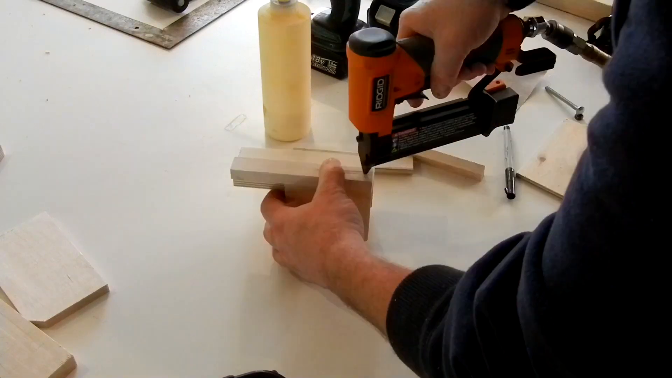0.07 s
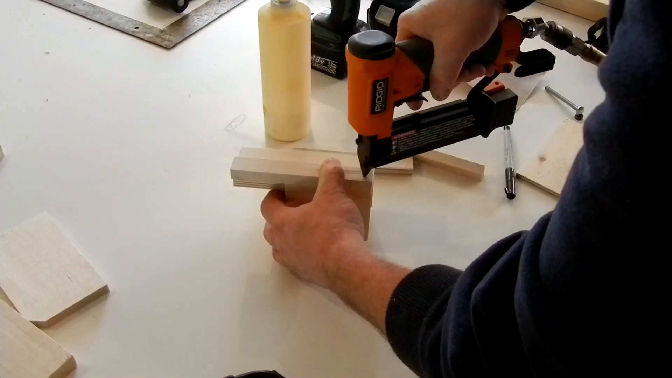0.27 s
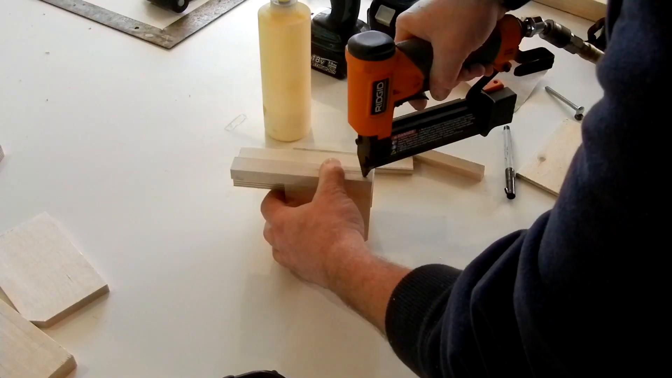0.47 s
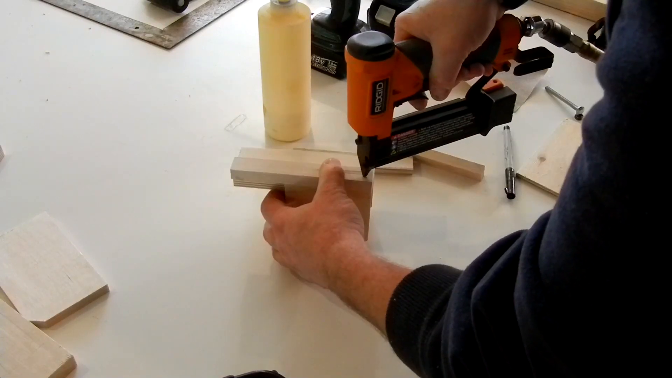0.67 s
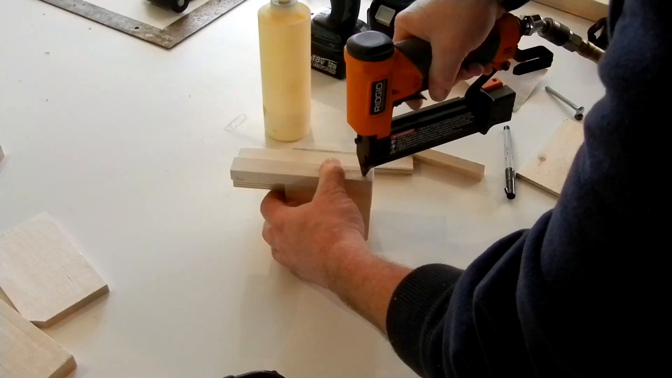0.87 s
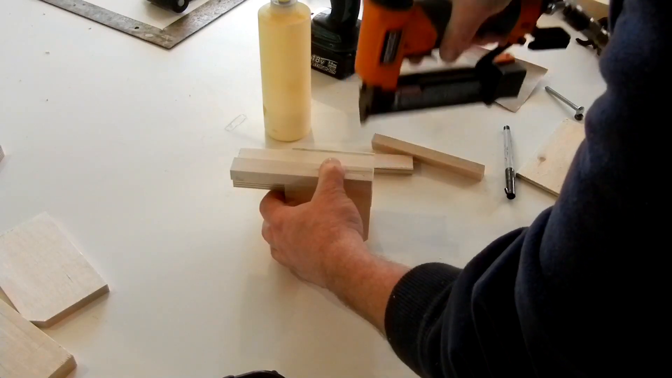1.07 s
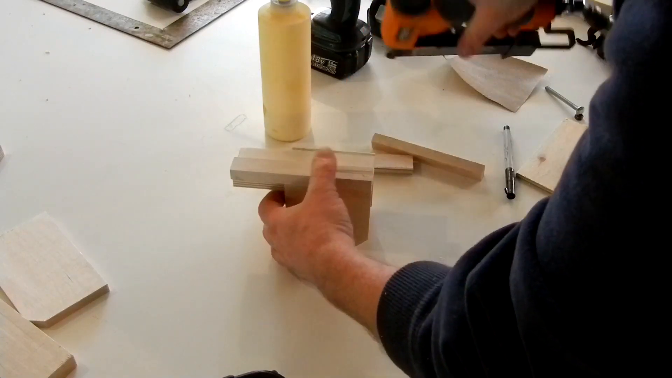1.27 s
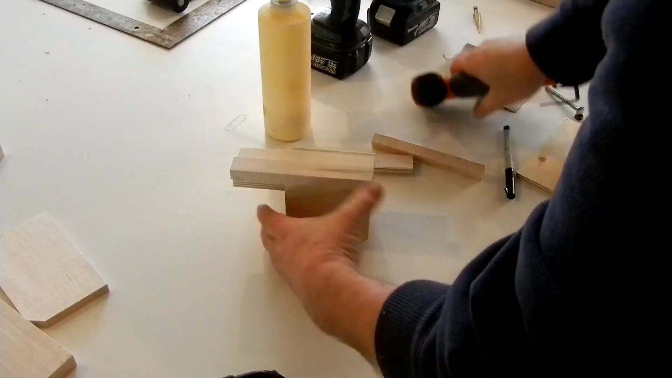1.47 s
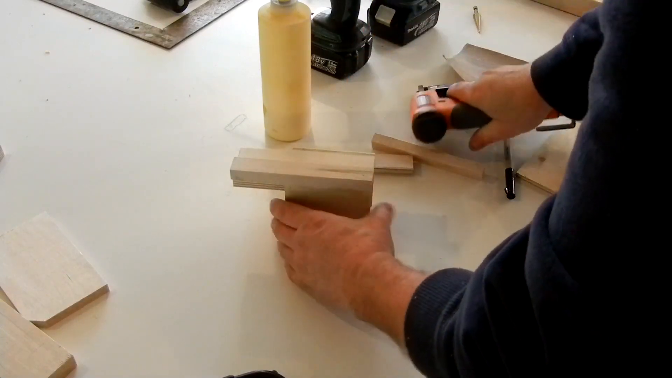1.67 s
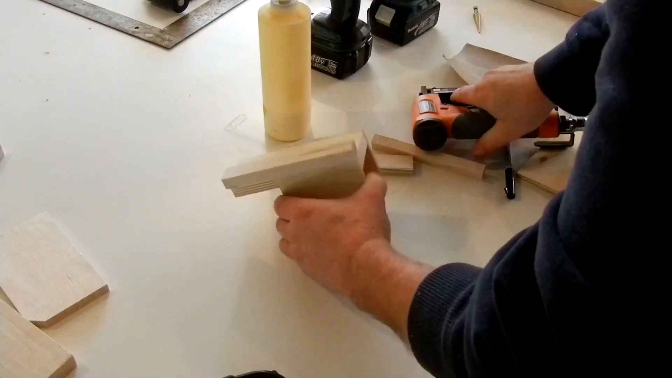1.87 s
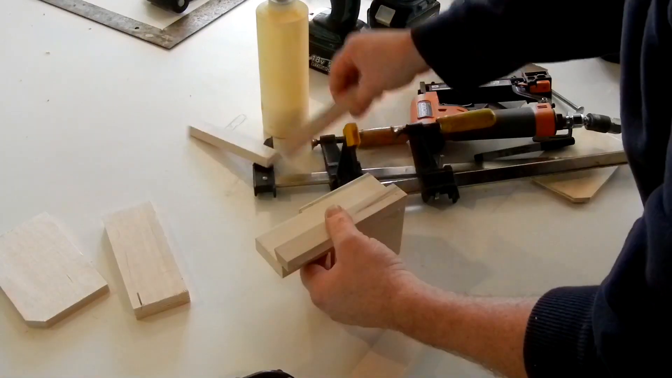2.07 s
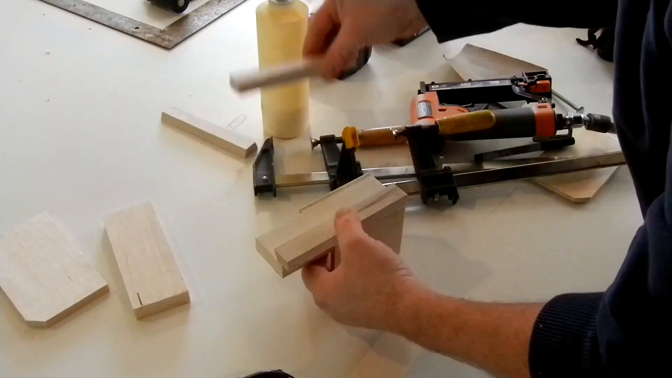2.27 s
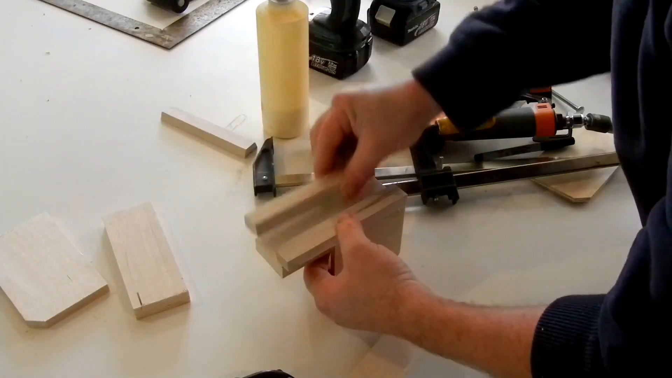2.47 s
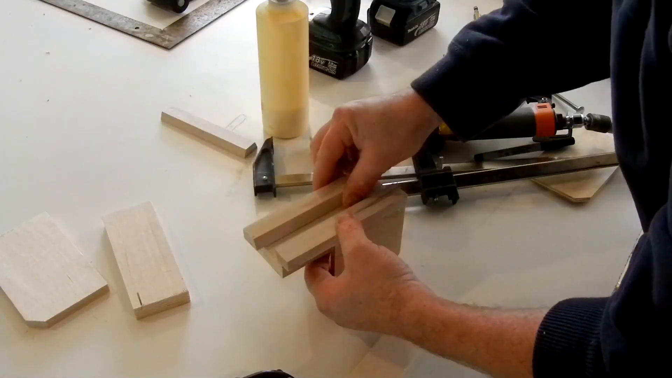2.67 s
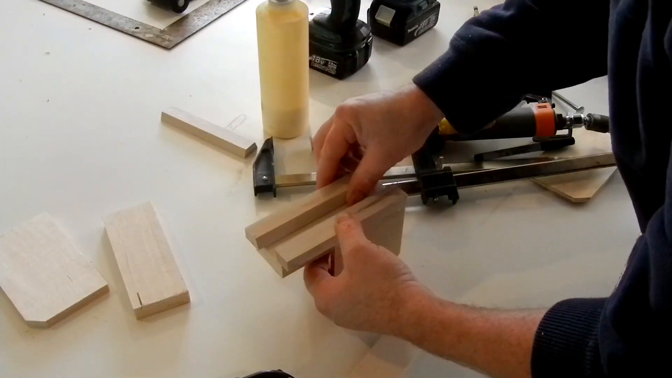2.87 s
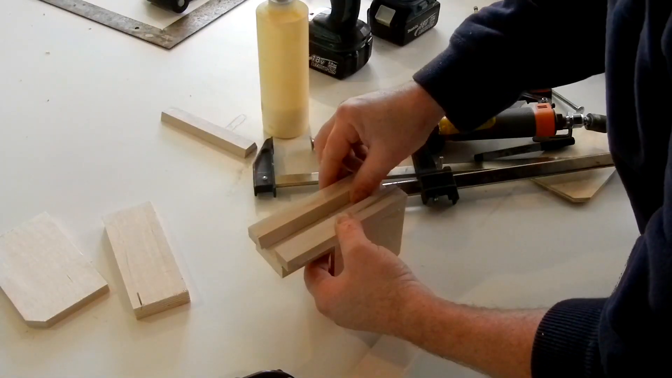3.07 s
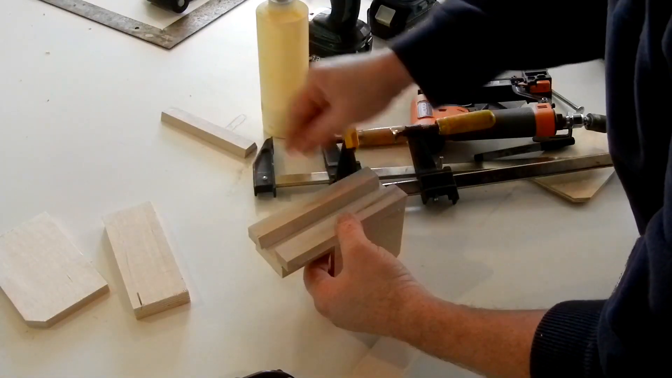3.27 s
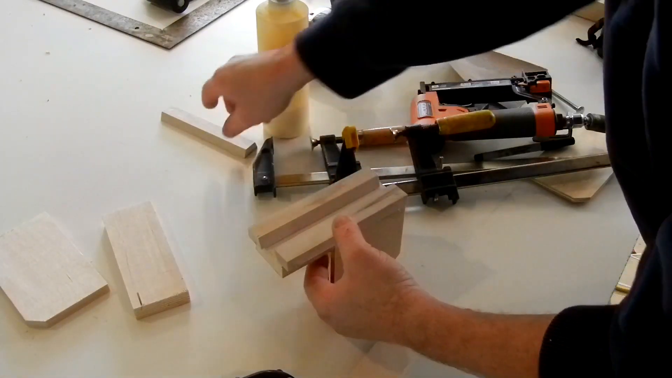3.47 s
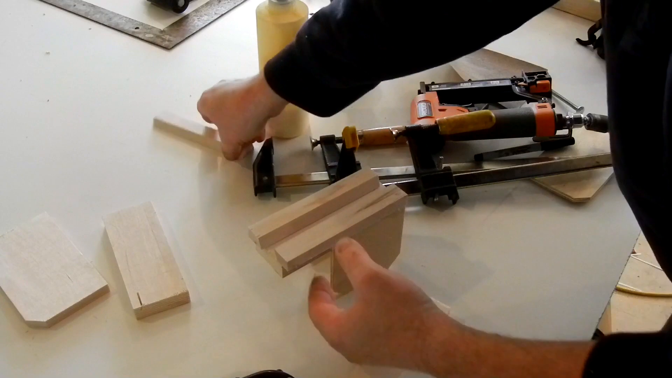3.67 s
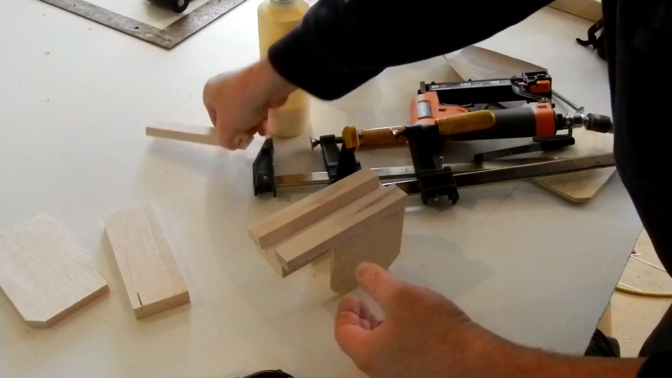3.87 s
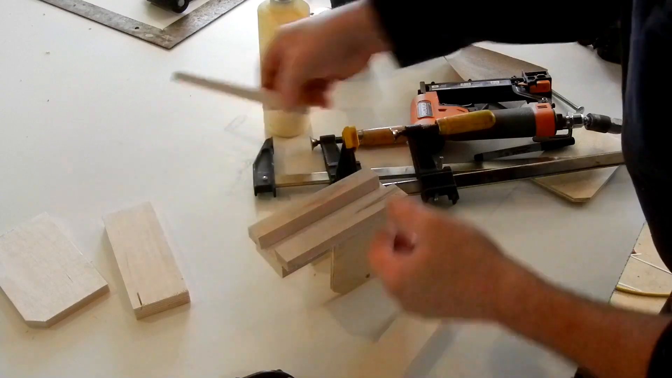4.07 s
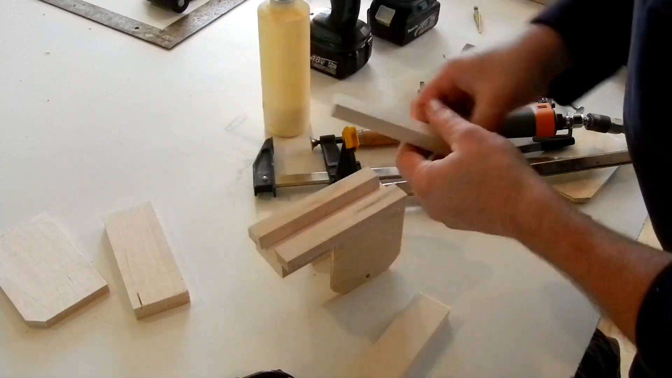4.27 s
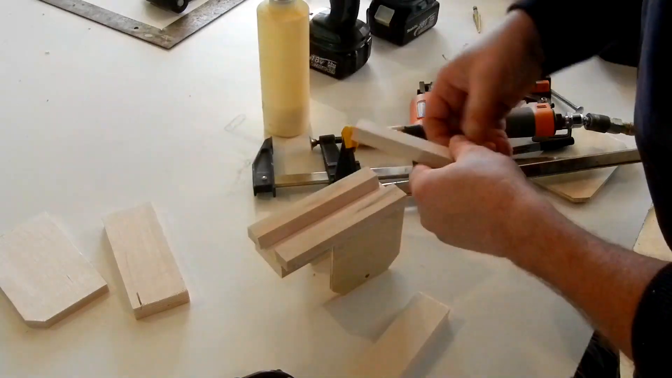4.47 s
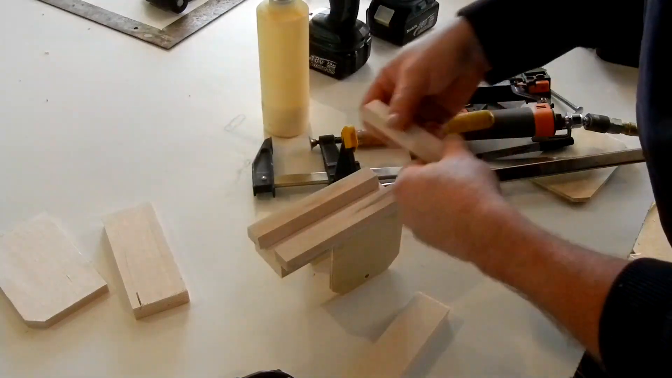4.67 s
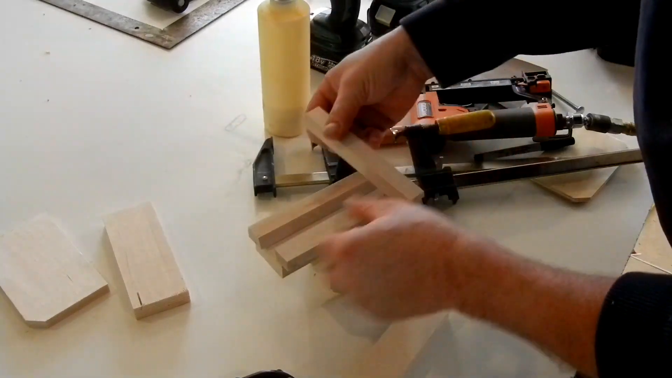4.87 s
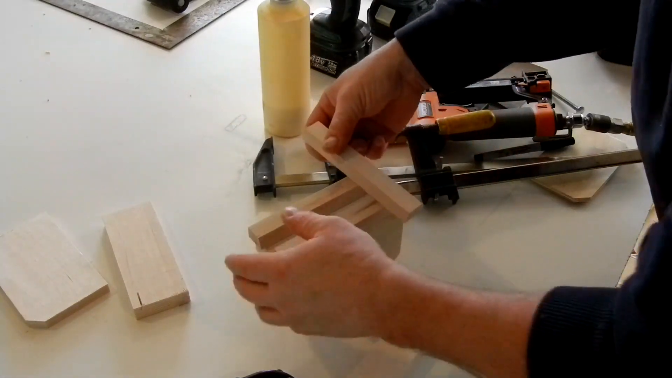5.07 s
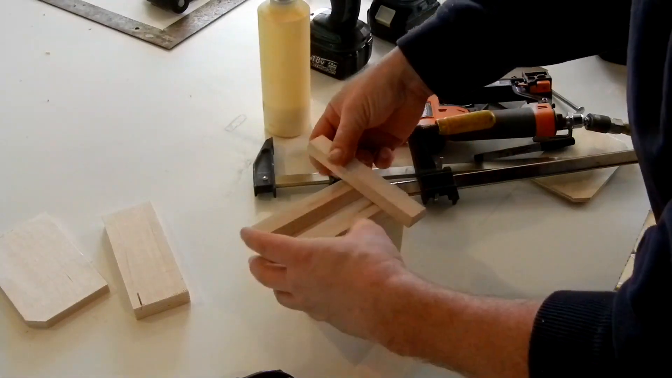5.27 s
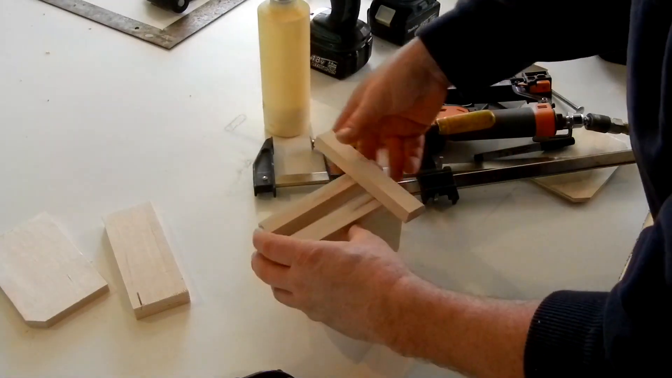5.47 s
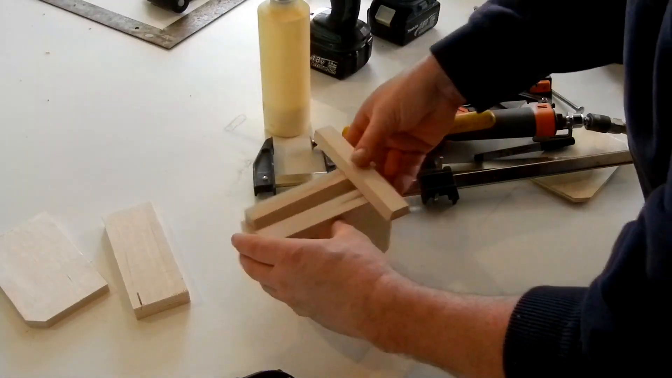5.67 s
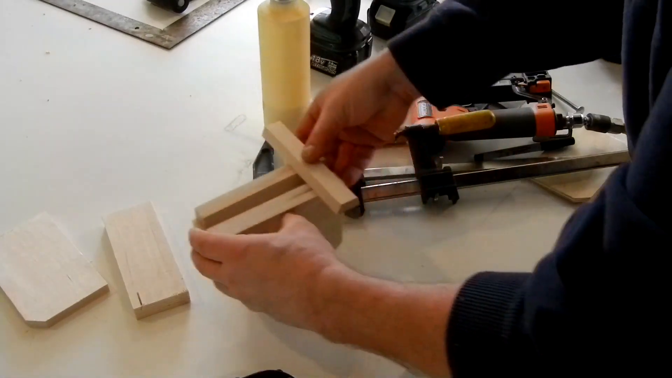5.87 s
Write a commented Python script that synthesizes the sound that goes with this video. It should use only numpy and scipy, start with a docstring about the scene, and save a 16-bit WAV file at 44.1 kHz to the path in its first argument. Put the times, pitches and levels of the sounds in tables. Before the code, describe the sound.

A very brief roar, the echo of an earlier shot, cuts off within a tenth of a second, followed by two soft bumps on a workbench. At 0.9 seconds a pneumatic nailer fires once with a loud, sharp snap, then vents a puff of air with a knock at 1.0, the hiss fading quickly. A light scrape leads to a solid thud at 1.6 as the tool is set down. From 1.9 to 2.4 seconds, wood and tools knock, clatter and slide, with a few small steel clinks. It then turns quiet: a soft tap at 2.7, and faint taps and a light slide around 3.8. A wooden knock comes at 5.3, then a short scrape and a cluster of small knocks from 5.6 to 5.9. The microphone is close, in a hard-walled workshop with a short echo and faint room hush.

```python
"""Pin nailer and workbench

A shot's roar hangs in a hard-walled workshop. A pneumatic pin nailer fires and vents in puffs of
turbulent air. The tool and small wooden pieces are set down, knocked and slid on a bench: blows and
stick-slip ring the wood, steel parts clink. The sound drops twice to a faint hush, first cutting off
the roar. A small stereo microphone with a limiter stands close by."""
import sys
import numpy as np
from scipy import signal
from scipy.fft import irfft
from scipy.io import wavfile
from scipy.ndimage import uniform_filter1d

SR = 44100
rng = np.random.default_rng(int(sys.argv[2]) if len(sys.argv) > 2 else 0)


def output_pcm(signal):
    """Save a mono or channel-first signal as 16-bit PCM at the path in sys.argv[1].

    Samples are clipped to [-1, 1] before scaling.
    """
    pcm = np.clip(np.atleast_2d(signal).T, -1, 1) * 32767
    wavfile.write(sys.argv[1], SR, np.round(pcm).astype(np.int16))


N = 261288
STRIKE_SAMPLES = 6000


def amp(db):
    return 10 ** (np.asarray(db) / 20)


def unit_rms(x):
    return x / np.sqrt(np.mean(x ** 2) + 1e-20)


def curve_at(points, hz):
    point_hz, value = np.transpose(points)
    return np.interp(np.log(hz + 1), np.log(point_hz + 1), value)


def add(mix, start_s, sound):
    part = mix[..., round(start_s * SR):][..., :sound.shape[-1]]
    part += sound[..., :part.shape[-1]]


def panned(x, left_db):
    return x * amp([[left_db / 2], [-left_db / 2]])


def noise(spectrum, patchy_db, coherence=((1, 1),), size=N):
    """Stereo noise at unit RMS, its level patchy in time and frequency."""
    hz = np.fft.rfftfreq(1024, 1 / SR)
    re, im, other_re, other_im, patches = rng.standard_normal((size // 256 + 5, 513, 5)).T
    patches = unit_rms(uniform_filter1d(uniform_filter1d(patches, 12, 0), 10, 1))
    alike = curve_at(coherence, hz)[:, None]
    left = re + 1j * im
    right = alike * left + np.sqrt(1 - alike ** 2) * (other_re + 1j * other_im)
    bins = np.array([left, right]) * amp(curve_at(spectrum, hz)[:, None] + patchy_db * patches)
    return unit_rms(signal.istft(bins, nperseg=1024, noverlap=768)[1][:, :size])


# Reverberant shot: freq_hz, density_db
ROAR_SPECTRUM = [(47, -52), (80, -48), (166, -7), (361, -11), (422, -2.5), (1170, -12), (1460, -6),
                 (1700, -6.5), (2660, -3.5), (4230, -17.5), (8990, -33), (15000, -29), (16000, -40)]
# Left-right likeness of the room's echo: freq_hz, coherence
ROOM_COHERENCE = [(60, 0.93), (180, 0.93), (550, 0.92), (1650, 0.99), (4970, 0.61), (15000, 1)]


def shot_roar(level_db=-18):
    """A shot ringing in the room, as steady noise."""
    roar = noise(ROAR_SPECTRUM, patchy_db=-0.5, coherence=ROOM_COHERENCE)
    return panned(amp(level_db) * roar, left_db=3.2)


# Noise floor: freq_hz, density_db
HUSH_SPECTRUM = [(15, -75), (25, -56), (87, -3.5), (185, -7.5), (223, -12), (270, -11), (384, -2.5),
                 (624, -7), (695, -6), (911, -9.5), (1650, -5.5), (1940, -6.5), (2610, -7), (4250, -16),
                 (16000, -23)]
# Its left-right likeness: freq_hz, coherence
HUSH_COHERENCE = [(60, 0.31), (3000, 0.21), (5500, 0.1), (7500, 1), (15000, 0.99)]


def room_hush(level_db=-50):
    """Room tone and microphone hiss."""
    hush = noise(HUSH_SPECTRUM, patchy_db=1.17, coherence=HUSH_COHERENCE)
    return panned(amp(level_db) * hush, left_db=0.5)


# Bench top: pitch_hz, level_db, t60_s
BENCH_MODES = [(178, -5.5, 0.08), (225, -4, 0.067), (289, -4.5, 0.061), (401.7, 0, 0.079),
               (471.7, 0.5, 0.078), (575, 2.5, 0.037), (653, -9, 0.13), (736, -4.5, 0.02)]
# Small wooden piece: pitch_hz, level_db, t60_s
PIECE_MODES = [(910, -3, .009), (1120, -2, .009), (1330, -1, .009), (1600, -1, .008), (1850, -1, .008),
               (2160, -1, .007), (2520, -1, .007), (2900, -1, .006), (3350, -1, .006)]


def wood_ring(modes, tilt_db_per_oct, sign=1):
    """Where a strike lands varies each mode's level and tuning; sign < 0 opposes neighbouring modes."""
    t = np.arange(STRIKE_SAMPLES) / SR
    scatter = rng.standard_normal((len(modes), 2))
    centre_hz = np.exp(np.mean(np.log([mode[0] for mode in modes])))
    wave = np.zeros_like(t)
    for k, (hz, db, t60_s) in enumerate(modes):
        mode_db = db + tilt_db_per_oct * np.log2(hz / centre_hz) + 1.5 * scatter[k, 0]
        mode_hz = hz * (1 + 0.02 * scatter[k, 1])
        wave += sign ** k * amp(mode_db - 60 * t / t60_s) * np.sin(2 * np.pi * mode_hz * t)
    wave = signal.lfilter(*signal.butter(3, 3400, fs=SR), wave)  # wood on wood is a soft contact
    return wave / abs(wave).max()


# Contact noise: freq_hz, density_db
CONTACT_SPECTRUM = [(2350, -6.5), (4000, -4.5), (5440, -8.5), (7440, -8), (8120, -11), (12900, -9.5),
                    (16000, -5)]
# Blows on the bench: start_s, thud_db, click_db, tick_db, hardness_db_per_oct, room_send_db
KNOCKS = [(0.164, -20, -44, -55, -7.5, -6), (0.360, -16.5, -46, -68, -3, -5), (0.909, -10, 7, -17, 10, -9),
          (1.005, -26, 6, -35, 0, -17.5), (1.025, -4.5, -29, -29, -16, -9.5),
          (1.649, 2.5, -5.5, -20.5, .5, 0.5), (1.893, -3, -4, -27.5, -4, -2),
          (1.982, -13.5, -14, -36, -14, -1), (2.088, -14, -43, -61, 18, -5),
          (2.114, -13.5, -50, -49, 0.5, 1.5), (2.198, -21, -12.5, -25.5, -11, -2.5),
          (2.235, -1.5, -11, -53, 4, -6), (2.271, -1, -13.5, -41, 7, -11), (2.407, -13, -6.5, -39, 11, -2),
          (2.710, -22.5, -32, -65, 4, -3.5), (3.233, -38.5, -47, -57, -2.5, 1),
          (3.756, -37, -45, -48, 0, 1), (3.789, -30, -31, -44, 3, 2.5), (3.918, -29, -47, -40, -13, -5.5),
          (4.466, -61, -42, -63, 0, -10), (4.501, -57, -50, -61, 0, -9), (5.307, -10, -12.5, -46, 19, -5.5),
          (5.719, -21.5, -29, -46, 6, -8), (5.829, -19.5, -24.5, -49, 12, -.5),
          (5.870, -16, -36, -51, 16, -4), (5.891, -25, -26, -55, 15, 2)]


def knocks():
    """Each blow rings bench and piece, with a bright contact tick. Returns direct sound and room send."""
    direct, send = np.zeros((2, N))
    t = np.arange(STRIKE_SAMPLES) / SR
    ticks = noise(CONTACT_SPECTRUM, patchy_db=1, size=len(t) * len(KNOCKS))[0].reshape(-1, len(t))
    ticks *= amp(-60 * t / 0.037) * np.minimum(t / 0.00062, 1)
    give = np.hanning(48) / 22  # the heavy top yields for 1 ms
    for (start_s, thud_db, click_db, tick_db, hardness, send_db), tick in zip(KNOCKS, ticks):
        thud = np.convolve(wood_ring(BENCH_MODES, hardness), give)[:len(t)]
        click = wood_ring(PIECE_MODES, tilt_db_per_oct=-3.5, sign=-0.99)
        blow = amp(thud_db) * thud + amp(click_db) * click + amp(tick_db) * tick
        add(direct, start_s, blow)
        add(send, start_s, amp(send_db) * blow)
    return direct, send


# Nozzle jet: freq_hz, density_db
JET_SPECTRUM = [(2350, -10.5), (4000, -13), (5600, -12), (5760, -12.5), (7100, -5), (8310, -8), (8700, -9),
                (13800, -2), (16000, -4)]
# Air through the housing: freq_hz, density_db
RUSH_SPECTRUM = [(59, -40), (100, 0), (151, 1.5), (301, -15), (373, 0.5), (541, -3.5), (602, -10),
                 (1850, -6.5), (3040, -9), (4490, -19), (7000, -19), (9100, -47), (15400, -120)]
# Valve opening, shot, blow-by, piston return, exhaust, long vent:
# peak_s, jet_db, rush_db, rise_db_per_ms, fall_db_per_ms
AIR_PUFFS = [(.872, -39.5, -55, 2.5, 0.3), (.904, -1.5, -10.5, 2.5, 1.5), (.911, -8, 2.5, 1.96, 3.5),
             (.996, -13.5, -13.5, .9, 0.4), (1.006, -13, -8.5, 2, 1), (1.017, 1.5, -7.5, 1.6, 1.5),
             (1.036, -10.5, -14.5, 0.5, 0.11)]


def nailer():
    """Puffs of turbulent air: a thin bright jet at the nozzle, a broader rush through the housing."""
    flow = np.zeros((2, N))
    for peak_s, jet_db, rush_db, rise, fall in AIR_PUFFS:
        ms = (np.arange(N) / SR - peak_s) * 1000
        flow += amp([[jet_db], [rush_db]]) * amp(np.minimum(rise * ms, -fall * ms))
    jet = flow[0] * noise(JET_SPECTRUM, patchy_db=1.5, coherence=[(1, 0.95)])
    rush = flow[1] * noise(RUSH_SPECTRUM, patchy_db=2.5, coherence=[(1, 0.94)])
    return panned(jet, left_db=1) + panned(rush, left_db=0.93)


# Things slid on the bench, each with its own note:
# start_s, length_s, rumble_db, scratch_db, hiss_db, swell_db, hardness_db_per_oct, note_hz, note_db
STROKES = [(1.367, 0.19, -37, -48.5, -57, 3.5, -6, 2500, 8),
           (1.5, 0.16, -44, -37.5, -51.5, 5, -7, 2490, 14.5),
           (1.956, .06, -26, -27.5, -43.5, 2, -5, 900, -12),
           (2.024, .14, -29.5, -33, -57, 6.5, 1.5, 1820, 0.5),
           (2.18, 0.207, -28, -32.5, -51.5, -11, 1.5, 1820, 4),
           (3.718, .04, -70, -62, -54, .1, -.6, 1170, -9), (3.768, .24, -43, -51, -57, -4, -.6, 1170, -11),
           (4.235, .15, -75, -61, -66, -5, 5, 1600, -7), (5.29, .016, -32.5, -35.5, -67, 9, -1, 2970, -6),
           (5.586, 0.24, -41, -40, -51, 1.5, 0.5, 1674, 11),
           (5.814, .12, -29.5, -35.5, -45.5, -5, 1.5, 1680, 12)]


def slides(slips_per_s=2500, ramp_share=0.33, note_t60_s=0.014):
    """Stick-slip: dense, uneven small blows ring bench and piece over a fine hiss."""
    out = np.zeros(N)
    slips = rng.standard_normal((2, N)) * amp(3.26 * rng.exponential(1, (2, N)))
    slips *= rng.random((2, N)) < slips_per_s / SR
    hiss = noise(CONTACT_SPECTRUM, patchy_db=2)[0]
    for start_s, length_s, rumble_db, scratch_db, hiss_db, swell_db, hardness, note_hz, note_db in STROKES:
        at = np.arange(round(start_s * SR), min(round((start_s + length_s) * SR), N))
        swell = amp(swell_db * np.linspace(-0.5, 0.5, len(at)))
        pressure = signal.windows.tukey(len(at), ramp_share) * swell
        out[at] += amp(hiss_db) * hiss[at] * pressure
        bench = wood_ring(BENCH_MODES, hardness, sign=-1.05)
        piece = wood_ring(PIECE_MODES + [(note_hz, note_db, note_t60_s)], -1.5, sign=-0.92)
        for train, db, wood in zip(slips, (rumble_db, scratch_db), (bench, piece)):
            drive = train[at] * amp(db) * pressure / np.std(train) / np.linalg.norm(wood)
            add(out, start_s, signal.fftconvolve(drive, wood))
    return np.array([out, out])


# Steel parts: pitch_hz, level_db, t60_s
STEEL_MODES = [(3213, -3, 0.025), (4600, -28, 0.05), (5090, -17, 0.032), (6480, -20.5, 0.09),
               (7430, -13, 0.028)]
# Metal contacts: start_s, level_db
CLINKS = [(1.65, -32), (1.975, -27), (2.198, -18.5), (2.271, -30.5), (2.317, -34)]


def clinks():
    """Tool parts touch and a few steel modes ring briefly."""
    out, t = np.zeros(N), np.arange(9000) / SR
    attack = np.minimum(t / 0.001, 1)
    for start_s, level_db in CLINKS:
        scatter_db = 2 * rng.standard_normal(len(STEEL_MODES))
        steel = sum(amp(db + offset_db - 60 * t / t60_s) * np.sin(2 * np.pi * hz * t)
                    for (hz, db, t60_s), offset_db in zip(STEEL_MODES, scatter_db))
        add(out, start_s, amp(level_db) * steel * attack)
    return np.array([out, out])


# Room decay: freq_hz, t60_s
ROOM_DECAY = [(100, 0.56), (400, 0.58), (1000, 0.78), (2800, 0.65), (5000, 0.52), (8000, 0.26),
              (15000, 0.06)]
# Stereo balance: freq_hz, left_over_right_db
BALANCE = [(60, 3), (180, 5.0), (550, 6), (1650, 5), (4970, 2.0), (15000, 0.0)]


def workshop(direct, send):
    """Direct sound plus sparse echoes, each band dying at its own rate; lows and mids lean left."""
    taps = np.zeros((2, SR))
    at = np.arange(160, SR - 20, 20) + rng.integers(0, 20, (2, (SR - 161) // 20))
    np.put_along_axis(taps, at, rng.choice([-1., 1.], at.shape), 1)
    hz, t, bins = signal.stft(taps, SR, nperseg=256)
    alike = curve_at(ROOM_COHERENCE, hz)[:, None]
    bins[1] = alike * bins[0] + np.sqrt(1 - alike ** 2) * bins[1]
    decay = amp(-60 * t / curve_at(ROOM_DECAY, hz)[:, None])
    tail = signal.istft(bins * decay, SR, nperseg=256)[1]
    tail *= 1 + 0.5 * np.exp(-np.arange(tail.shape[1]) / (0.012 * SR))  # bench and near wall answer first
    heard = direct + signal.fftconvolve(send, tail / np.linalg.norm(tail[0]), axes=1)[:, :N]
    balance = amp(np.outer([0.5, -0.5], curve_at(BALANCE, hz)))
    balance_fir = np.roll(irfft(balance), 128, axis=1)
    return signal.oaconvolve(heard, balance_fir, "same", axes=1)


# Near-silent gaps: start_s, end_s
GAPS = [(.0776, .097), (2.0122, 2.025)]


def scene():
    """Bench work and nailer in the room; the first gap ends the roar, and echoes from before the second gap
    ring on after it."""
    t = np.arange(N) / SR
    (roar_end_s, _), (_, resume_s) = GAPS
    knock_direct, knock_send = knocks()
    handling = slides() + clinks()
    air = nailer()
    direct = knock_direct + handling + air
    send = knock_send + amp(-2.5) * handling + amp(-5) * air
    heard = sum(workshop(direct * span, send * span) for span in (t < resume_s, t >= resume_s))
    low_cut = signal.butter(3, 120, "high", fs=SR, output="sos")  # the small microphone passes little deep bass
    heard = signal.sosfilt(low_cut, heard)
    roar = shot_roar() * (t < roar_end_s)
    hush = room_hush()
    in_gap = sum((t >= start_s) & (t < end_s) for start_s, end_s in GAPS) > 0
    return np.where(in_gap, amp(-2.5) * hush, heard + roar + hush)


def record(dry):
    """A limiter ducks just after the loudest peaks and recovers; soft clip; low-pass."""
    threshold_db, slope, attack_s, release_db_per_s, cutoff_hz = -14, 0.69, 0.0043, 94, 16100
    power_db = 10 * np.log10(abs(uniform_filter1d((dry ** 2).mean(0), 200)) + 1e-12)
    release_db = np.arange(N) * release_db_per_s / SR
    held_db = np.maximum.accumulate(power_db + release_db) - release_db
    over_db = np.maximum(held_db - threshold_db, 0)
    lag = np.exp(-1 / (attack_s * SR))
    duck_db = signal.lfilter([1 - lag], [1, -lag], slope * over_db)
    clipped = np.tanh(dry / amp(duck_db))
    low_pass = signal.firwin(1023, cutoff_hz, window=("kaiser", 9), fs=SR)
    return signal.oaconvolve(clipped, low_pass[None], "same")


dry = scene()
out = record(dry)
output_pcm(out)
```